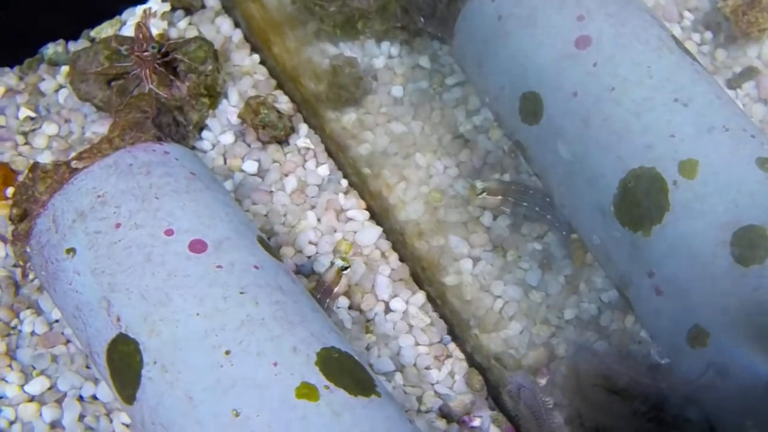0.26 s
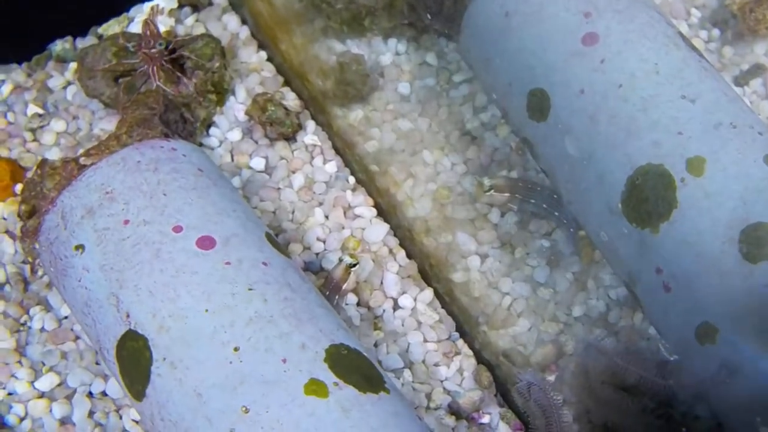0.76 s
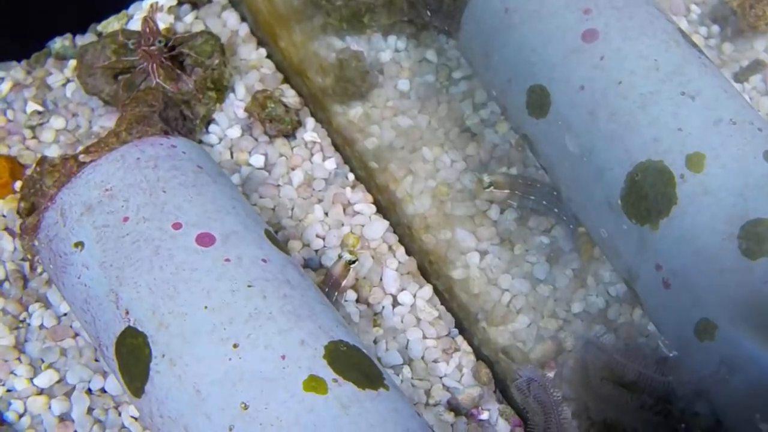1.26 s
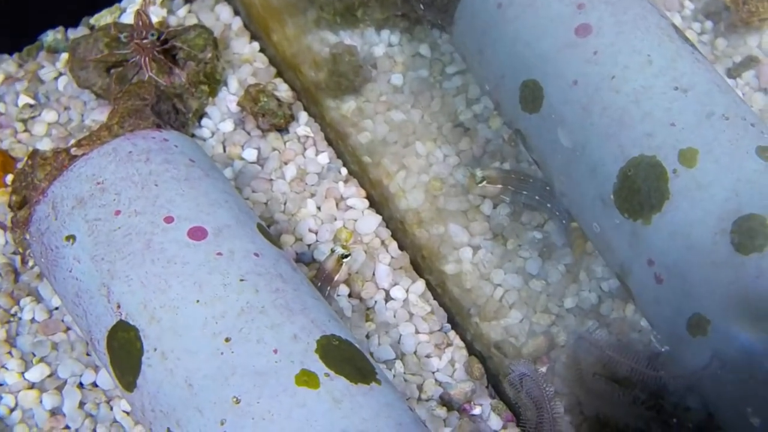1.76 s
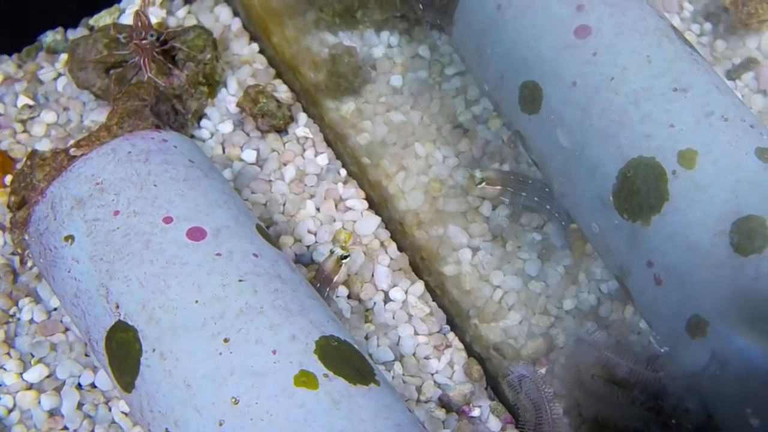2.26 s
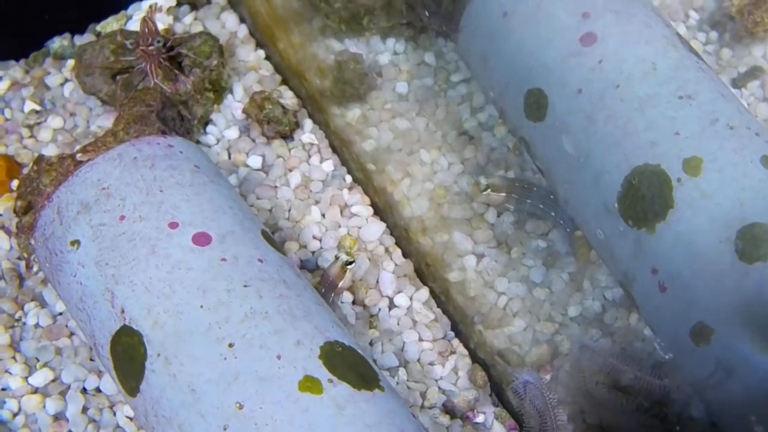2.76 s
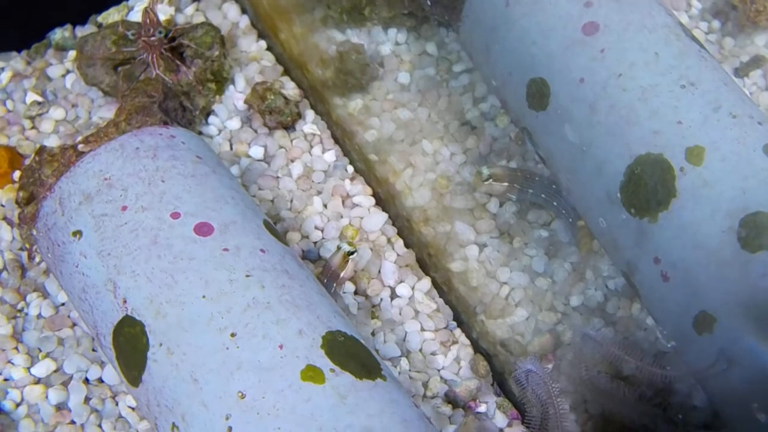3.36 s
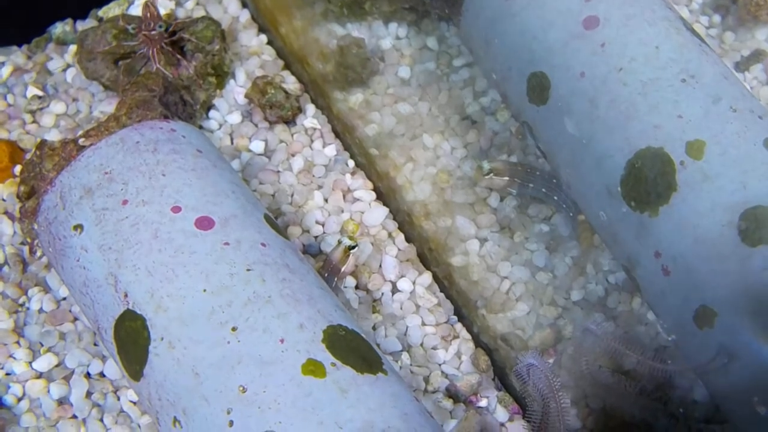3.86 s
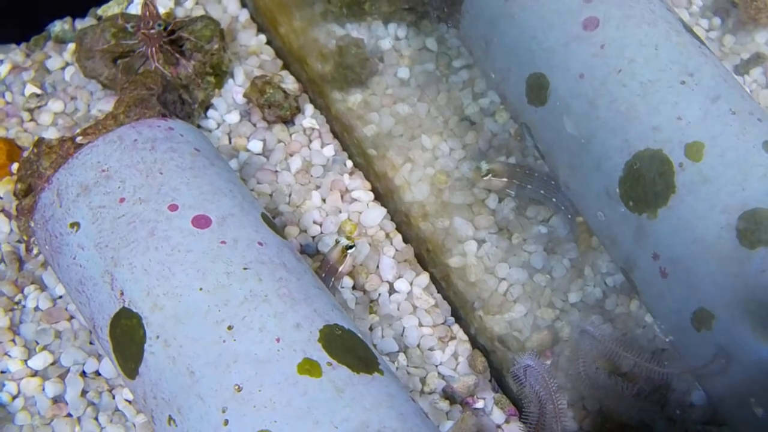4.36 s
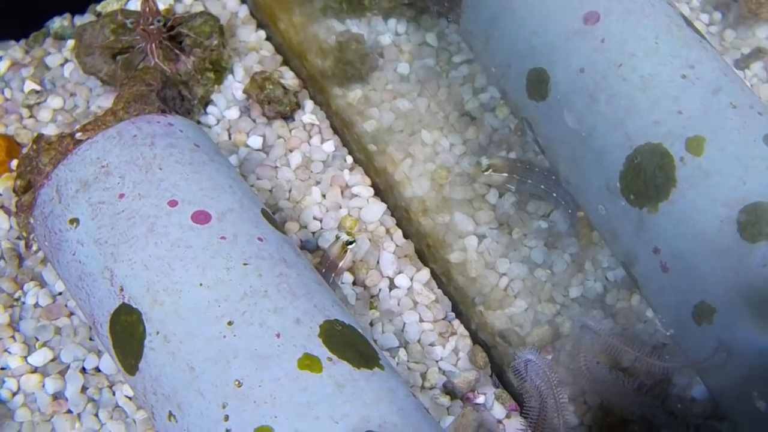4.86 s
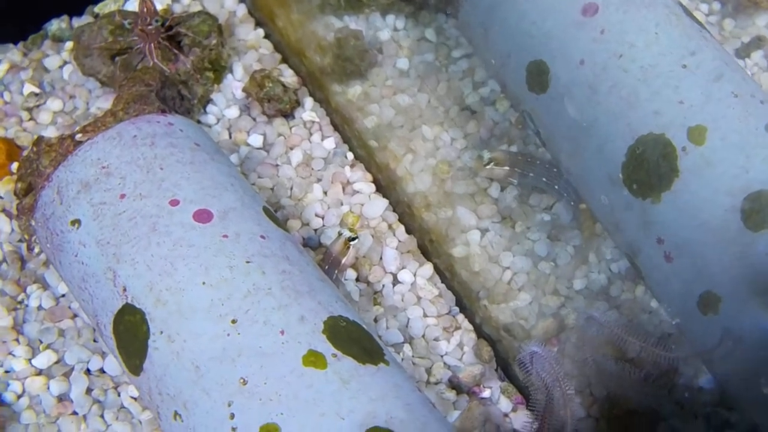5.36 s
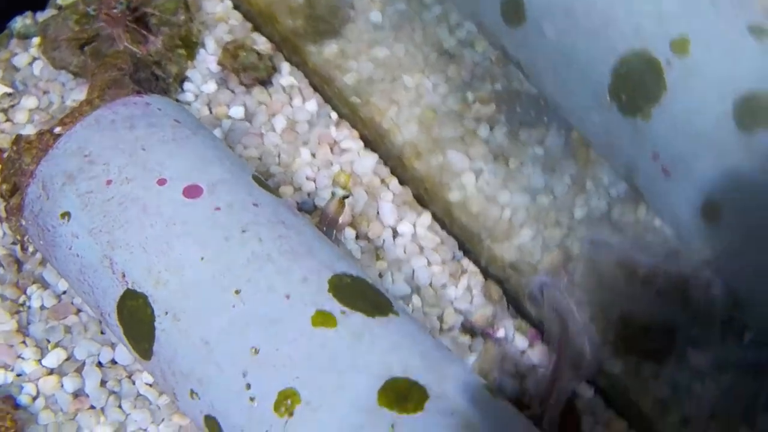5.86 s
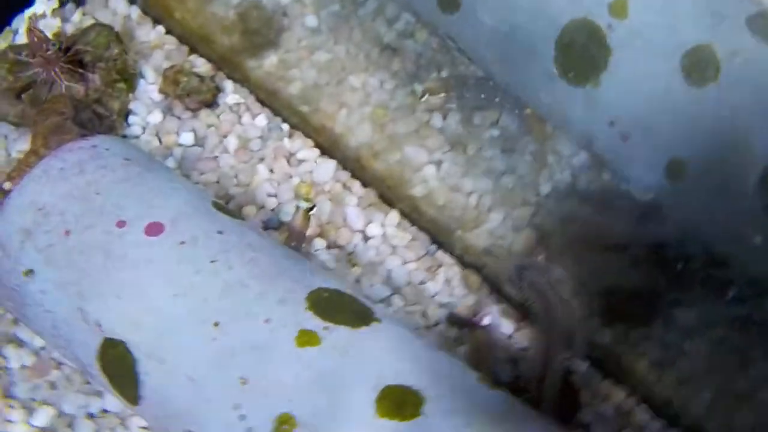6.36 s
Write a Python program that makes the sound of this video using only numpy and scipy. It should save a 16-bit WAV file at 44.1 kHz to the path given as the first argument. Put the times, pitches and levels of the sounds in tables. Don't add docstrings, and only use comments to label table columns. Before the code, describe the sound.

From 0 seconds, a small sealed camera under water picks up pumps humming steadily, a buzzy low-to-middle drone locked to mains power, inside a hollow rush of turbulent flow. The hum wavers, with a brief lift around 0.1 seconds and gentle swells as the camera sways. Dense tiny bubbles fizz and crackle all along, bright but boxed in by the housing. A distinct close pop comes at about 0.6 seconds, then irregular plips and snaps continue until about 6.4 seconds, some sharper, others faint and farther off, with short tank reflections. Very thin electronic hiss and regular faint ticks sit beneath. From about 5.7 seconds the camera drifts towards a pump: its low hum swells, strongest around 6.4 seconds, while the lower fizz is partly screened. The sound stays continuous to the end at about 6.6 seconds, easing only slightly.

```python
import sys
import numpy as np
from scipy import signal
from scipy.fft import rfft, irfft
from scipy.io import wavfile
from scipy.ndimage import uniform_filter1d

SR = 44100
rng = np.random.default_rng(int(sys.argv[2]) if len(sys.argv) > 2 else 0)


def to_linear_factor(level_db):
    exponent = np.asarray(level_db, float) / 20
    return 10 ** exponent


def dump(signal):
    limited = np.clip(np.atleast_2d(signal).T, -1, 1)
    pcm = np.round(limited * 32767).astype(np.int16)
    wavfile.write(sys.argv[1], SR, pcm)


N = 291060
MAINS_HZ = 50.017
SECOND_SHARE, SECOND_DB = 0.17, -0.73
DRONE_SHARE, DRONE_DB = 0.089, 0.28
FIZZ_SHARE, FIZZ_DB = 0.13, -0.22


def evened(x):
    return x / np.sqrt(np.mean(x ** 2) + 1e-20)


def wander(top_hz):
    rate_hz = 40
    coarse = rng.standard_normal(int(N / SR * rate_hz) + 2)
    coarse = signal.lfilter([1], [1, -np.exp(-2 * np.pi * top_hz / rate_hz)], coarse)
    coarse = evened(coarse - coarse.mean())
    return np.interp(np.arange(N) / SR * rate_hz, np.arange(len(coarse)), coarse)


def band(x, lo_hz, hi_hz, order):
    hz = np.fft.rfftfreq(N, 1 / SR) + 1e-9
    low_side = 1 + (lo_hz / hz) ** order
    high_side = 1 + (hz / hi_hz) ** order
    return irfft(rfft(x) / low_side / high_side, N)


def ports(first, second, table):
    per_hz_db = -60 + 10 * np.log10(SR / 2)
    hz = np.fft.rfftfreq(N, 1 / SR)
    rows = np.array(table)
    curves = [np.interp(np.log(hz + 1), np.log(rows[:, 0]), column) for column in rows[:, 1:].T]
    left_db, right_db, like, *lead = curves
    like = np.clip(like, 0, 1)
    inside = (hz > rows[0, 0]) & (hz < rows[-1, 0])
    a, b = rfft(first), rfft(second)
    shared = like * a * np.exp(1j * sum(lead))
    right = shared + np.sqrt(1 - like ** 2) * b
    both = np.array([a * to_linear_factor(left_db), right * to_linear_factor(right_db)])
    return irfft(inside * both * to_linear_factor(per_hz_db), N)


def echoes(x, t60, wet_db):
    t = np.arange(2600) / SR
    turn = np.pi * 3.1 * np.arange(N) / SR
    wet = 0
    for k in range(4):
        sparse = rng.standard_normal((2, len(t))) * (rng.random((2, len(t))) < .2)
        tail = sparse * to_linear_factor(-60 * t / t60) * (t > .0012)
        tail /= np.linalg.norm(tail, axis=1, keepdims=True)
        path = x * np.cos(turn + k * np.pi / 4) / np.sqrt(2)
        wet = wet + signal.oaconvolve(path, tail, axes=1)[:, :N]
    return (x + to_linear_factor(wet_db) * wet) / np.hypot(1, to_linear_factor(wet_db))


def bubble(hz, length_ms, rise):
    u = np.arange(int(SR * length_ms / 300)) / (SR * length_ms / 1000)
    shape = (u / .7) ** 5 * np.exp(5 - 5 * u / .7)
    cycles = hz * length_ms / 1000
    return shape * np.sin(2 * np.pi * cycles * (u + rise * (u - .7) ** 2))


def place(out, s, part, db, pan_db):
    sides_db = db + np.array([[pan_db / 2], [-pan_db / 2]])
    out[:, round(s * SR):][:, :len(part)] += to_linear_factor(sides_db) * part


# (time [s], nearness [dB])
SWAY = [(0.0, -8), (0.13, 4.5), (0.24, -4), (0.37, 0.5), (0.83, -6), (1.14, -0.5), (1.43, -6), (1.8, 0.5),
        (2.2, -6.5), (2.37, 1), (2.66, -3), (3.44, -1), (3.55, -3.5), (5.07, 1.5), (5.5, 0.5), (5.75, 3.5),
        (6.4, 11.5), (6.6, 8.5)]


def nearness(share=1, rest_db=0):
    s, db = np.transpose(SWAY)
    return rest_db + share * np.interp(np.arange(N) / SR, s, db)


# (frequency [Hz], left level [dB], right level [dB], likeness [0-1])
HISS = [(8250, -62, -63, .1), (8500, -49.5, -49.5, .2), (9200, -45, -46, .2), (12000, -46.5, -46.5, .25),
        (15900, -47, -47, .45)]


def camera():
    tick_hz, tick_start_s = 58.7, .0047
    ticks = np.zeros(N)
    ticks[np.round(np.arange(tick_start_s, N / SR, 1 / tick_hz) * SR).astype(int)] = 1
    ticks = signal.sosfilt(signal.butter(2, 13000, "high", fs=SR, output="sos"), ticks)
    hiss = ports(*rng.standard_normal((2, N)), HISS) * to_linear_factor(.6 * wander(top_hz=12.0))
    return hiss + to_linear_factor(-76) * evened(ticks)


# (frequency [Hz], left level [dB], right level [dB], likeness [0-1], right lead [radians])
FLOW = [(30, -82, -58.5, 0.26, 0.9), (111, -33, -42, 0.4, 1.2), (272, -27.5, -28, 0.6, 2.4),
        (376, -16, -23.5, 0, 1.5), (528, -8.5, -4, 0.96, 1.15), (673, -7, -5.5, 0.67, 1.1),
        (720, -9, 5, 0.29, 1.13), (840, -8, -3, 0.69, 0.45), (1030, -5.5, -3, 1, 0.56),
        (1450, -6.5, -8, 0.92, -0.57), (1954, -6.5, -7, 1, 1), (2122, -6.5, -25.5, 1, 0.038),
        (2253, -25.5, -17.5, 0.06, -0.35), (2440, -54, -36, 0.1, 1.3)]


def flow():
    throb = 1 + .04 * np.cos(2 * np.pi * 2 * MAINS_HZ * np.arange(N) / SR)
    rush = band(ports(*rng.standard_normal((2, N)) * throb, FLOW), 53, SR, order=2)
    first = band(rush, 650, 620, order=10)
    second = band(rush, 450, 910, order=10)
    rest = rush - first - second
    near = uniform_filter1d(nearness(), size=SR)
    moved = first * to_linear_factor(.5 * near) + second * to_linear_factor(nearness(SECOND_SHARE, SECOND_DB))
    return moved + rest * to_linear_factor(nearness(DRONE_SHARE, DRONE_DB))


def swarm(per_s, spread_db, smooth_db):
    lo_hz, hi_hz, kinds = 1700, 12000, 30
    dense = per_s / SR * to_linear_factor(3.0 * wander(top_hz=9.0))
    size = to_linear_factor(spread_db * np.minimum(rng.exponential(1, N), 3.6)) * (rng.random(N) < dense)
    kind = rng.integers(0, kinds, N)
    out = np.zeros(N)
    for k, hz in enumerate(np.linspace(lo_hz, hi_hz, num=kinds)):
        ring = bubble(hz, rng.uniform(0.65, 2.25), 0.07)
        out += signal.oaconvolve(size * (kind == k), ring / np.linalg.norm(ring))[:N]
    white = np.sqrt((hi_hz - lo_hz) / (SR / 2))
    spray = to_linear_factor(smooth_db) * rng.standard_normal(N)
    return (white * evened(out) + spray) / np.hypot(1, to_linear_factor(smooth_db))


# (frequency [Hz], left level [dB], right level [dB], likeness [0-1], right lead [radians])
FIZZ = [(2490, -45, -46, .07, 1.2), (2580, -28, -27, .6, 1.2), (2780, -23.5, -24.5, .83, .8),
        (2960, -33.4, -31.7, .79, .3), (3500, -20, -18.2, .86, -.6), (3800, -17.7, -20.1, .67, -.7),
        (4100, -11.6, -13.9, .69, 0), (4700, -16.4, -13, .29, .2), (5300, -18, -18, .18, .8),
        (6850, -18.3, -21.2, .55, .1), (7300, -30.5, -27.5, .43, -.6), (7600, -42, -42, .2, -1.2),
        (7900, -57, -58, .22, .5), (8250, -61, -62, .29, 0)]
# (frequency [Hz], left level [dB], right level [dB], likeness [0-1])
AIR = [(8400, -58, -56, 0.3), (9180, -42, -46.5, 0), (10400, -54, -48, .2), (12000, -64, -60, .2)]


def fizz():
    screen_from_db = 5.5
    pair = np.array([swarm(per_s=3000, spread_db=4.7, smooth_db=-2.0) for _ in "lr"])
    pair = echoes(pair, t60=.04, wet_db=-7.0)
    heard = ports(*pair, FIZZ)
    low = band(heard, 2100, 3600, order=12)
    shaded = np.maximum(uniform_filter1d(nearness(), size=SR // 2) - screen_from_db, 0)
    screened = heard - low + low * to_linear_factor(-1.3 * shaded)
    air = ports(*pair, AIR) * to_linear_factor(2.5 * wander(top_hz=8.0))
    return to_linear_factor(0.96 + nearness(FIZZ_SHARE, FIZZ_DB)) * (screened + air)


# (time [s], peak level [dB], pitch [Hz], left over right [dB])
SPECKS = [(0.2758, -54, 9640, 0.5), (0.7352, -52, 9300, 2.5), (0.9298, -49, 8760, -5),
          (0.9652, -54, 12000, 0.5), (1.0166, -46, 9430, 0.5), (1.2456, -53, 9430, -0.5),
          (1.3947, -51, 9590, -2), (1.6985, -46, 9550, -0.5), (2.2862, -52, 9240, 0.0),
          (2.3266, -54, 8790, -1), (2.3955, -48, 11400, -0.5), (2.9362, -52, 9270, -1),
          (3.5473, -47, 8890, 4), (3.703, -52.5, 9510, 0.5), (3.7773, -47, 9150, -1),
          (3.8372, -52, 11700, 0.5), (5.0584, -56, 9760, 0.5), (5.233, -49, 9960, 0.5),
          (5.3587, -52, 9700, 0.0), (5.3971, -46, 9780, -2), (5.5223, -59, 9310, 2),
          (5.6101, -49, 9630, 0.5), (5.8676, -43, 9490, 0.0), (6.0272, -63, 8760, 5)]


def specks():
    out = np.zeros((2, N + SR))
    for s, db, hz, pan_db in SPECKS:
        place(out, s, bubble(hz, .6, .02), db, pan_db)
    return band(echoes(out[:, :N], t60=.02, wet_db=-6.0), 6300, 15700, order=40)


def faint_pops():
    count = 55
    when, pitch, size, bright = rng.random((count, 4)).T
    s = (np.arange(count) + when) * N / SR / count
    db = -35 + 4 * (2 * size - 1)
    hz = 4000 + 800 * pitch ** 2
    bright_db = -8 + 16 * (bright - .5)
    return list(zip(s, db, hz, bright_db))


# (time [s], peak level [dB], pitch [Hz], brightness [dB])
POPS = [(0.631, -16, 4450, -16), (0.8673, -26, 4600, -2), (0.9672, -17.5, 5120, -3), (1.003, -23, 4160, -6),
        (1.082, -24.5, 4300, -3), (1.4675, -25, 4160, 0), (1.5434, -25, 4500, -14),
        (1.6422, -19.5, 4280, -15), (1.7494, -22.5, 6580, -4), (1.781, -17.5, 4350, -11),
        (2.0782, -20.5, 4160, -19), (2.299, -26, 4800, -10), (2.409, -33, 4000, 5), (2.8804, -26, 4200, 0),
        (3.0205, -19, 6800, -17), (3.1115, -27, 4150, -5), (3.505, -28.5, 4260, 4.5),
        (3.555, -24.5, 4940, 3), (3.7512, -23, 4060, -9), (4.07, -23, 4870, 0), (4.1625, -22, 4330, -3),
        (4.287, -17, 4550, -20), (4.5368, -24.5, 4400, -16), (4.922, -24.5, 5570, -1),
        (5.4156, -22.5, 5830, -9), (5.534, -22, 4330, -10), (5.611, -21, 4400, -5), (5.8702, -20, 6760, 1),
        (5.928, -25, 4630, -7), (6.383, -27.5, 4870, 3.5)]


def pops():
    cycles = 7.2
    left_db_per_khz, centre_hz = 2.5, 4200
    snap_lag_s = .0002
    out = np.zeros((2, N + SR))
    for s, db, hz, bright_db in POPS + faint_pops():
        pan_db = left_db_per_khz * (hz - centre_hz) / 1000
        ring = bubble(hz, 1000 * cycles / hz, .03)
        snap = to_linear_factor(bright_db - 3.5) * (bubble(6600, 1.6, .04) + bubble(5500, 1.6, .04))
        late_snap = np.pad(snap, (round(snap_lag_s * SR), 0))
        place(out, s, ring, db, pan_db)
        place(out, s, late_snap, db, pan_db)
    out = echoes(out[:, :N], t60=.035, wet_db=-5.5)
    return band(out, 3600, 7200, order=30)


def nearness_db(hz):
    first = np.exp(-((hz - 570) / 90) ** 2)
    second = np.exp(-((hz - 760) / 90) ** 2)
    rest = max(1 - first - second, 0)
    body_db = first * nearness(1.04, 3.0) + second * nearness(SECOND_SHARE, SECOND_DB)
    return body_db + rest * nearness(DRONE_SHARE, DRONE_DB)


HUM_ORDERS = [4, 5, 6, 8, 10, 12, 14, 15, 16, 18, 20, 22, 24, 25, 26, 28, 29, 31, 32, 34, 35, 37, 40, 42,
              43, 46, 52, 64, 68, 70]
# (left level [dB], right level [dB], right lead [radians])
HUM_PORTS = [(-81, -70, 2.0), (-70, -84, 1.4), (-79, -68, -0.6), (-68, -48, 2.7), (-52, -51, -1.8),
             (-46, -38, 2.6), (-51, -34, 0.7), (-64, -47, 1.4), (-48, -37, -0.2), (-57, -45, 0.3),
             (-44, -38, 0.4), (-47, -46, 0.1), (-61, -54, 0.1), (-47, -46, -0.1), (-46, -45, -0.1),
             (-48, -46, -0.4), (-52, -50, -0.1), (-50, -51, -0.4), (-44, -47, -0.1), (-50, -52, -0.0),
             (-52, -53, -0.3), (-48, -50, 0.2), (-43, -45, 0.4), (-44, -52, 1.0), (-57, -72, 0.4),
             (-67, -80, 0.5), (-83, -72, 1.8), (-73, -68, -0.3), (-73, -71, -0.2), (-64, -62, -0.6)]


def hum():
    t = np.arange(N) / SR
    out = np.zeros((2, N))
    for order, (left_db, right_db, lead) in zip(HUM_ORDERS, HUM_PORTS):
        hz = order * MAINS_HZ
        turn = 2 * np.pi * (hz * t + .021 * order ** 2) + 0.56 * wander(top_hz=3.6)
        level = np.sqrt(2) * to_linear_factor(nearness_db(hz) + 1.68 * wander(top_hz=1.07))
        out += level * [to_linear_factor(left_db) * np.cos(turn), to_linear_factor(right_db) * np.cos(turn + lead)]
    return out


def scene():
    return camera() + flow() + fizz() + specks() + pops() + hum()


def roll_off(x):
    return signal.sosfilt(signal.butter(12, 15780, fs=SR, output="sos"), x)


def record(dry):
    return roll_off(dry)


dry = scene()
out = record(dry)
dump(out)
```